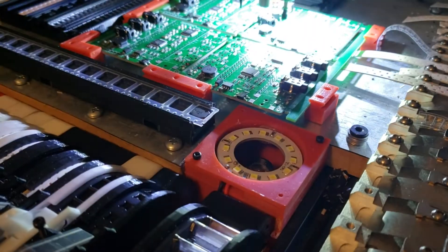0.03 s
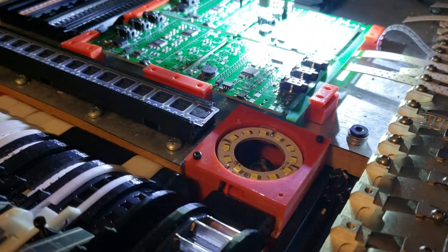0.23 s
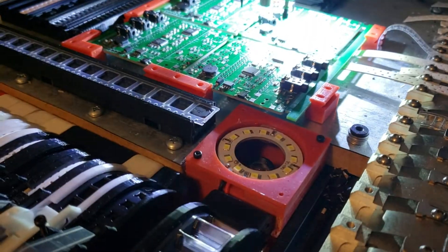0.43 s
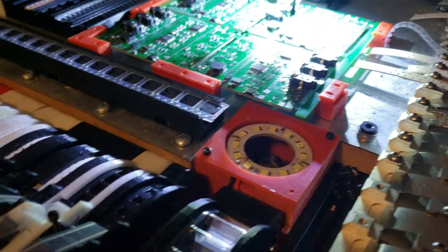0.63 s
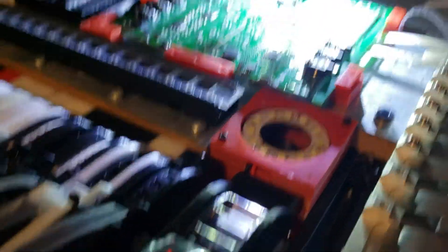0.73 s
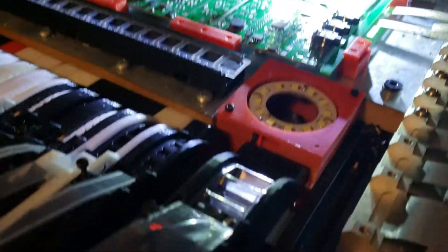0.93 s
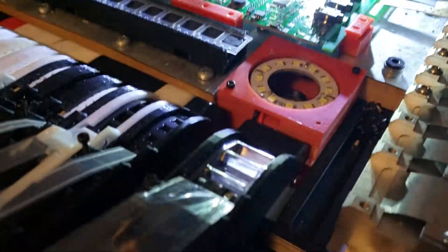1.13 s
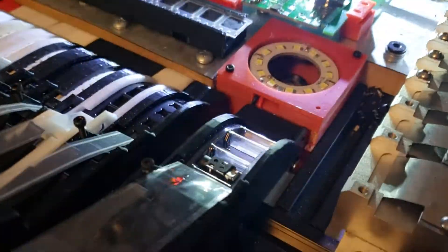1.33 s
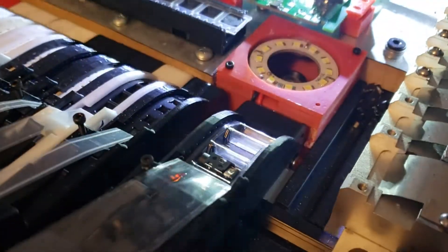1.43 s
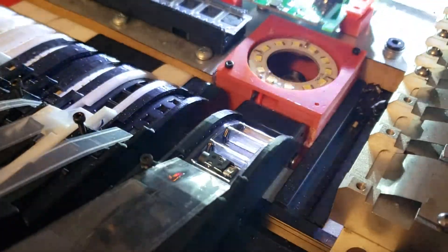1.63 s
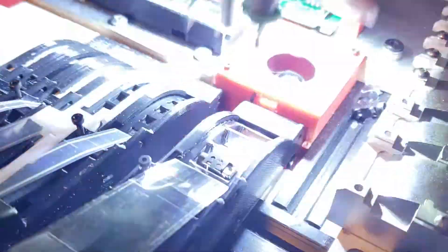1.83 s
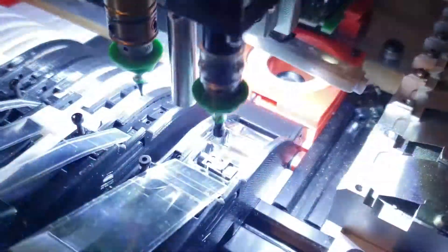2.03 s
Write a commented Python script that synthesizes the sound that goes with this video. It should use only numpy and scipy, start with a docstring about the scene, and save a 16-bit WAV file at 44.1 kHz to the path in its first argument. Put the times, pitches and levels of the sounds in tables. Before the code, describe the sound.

Close and slightly left, the tape feeder of a component placing machine buzzes twice with a high, ratcheting gear whine and a few clicks. Then the head's motor briefly speeds up and brakes, with a low rumble in a quiet workshop.

```python
"""Pick-and-place machine, close up

A stereo pair close in, the machine to its left. The tape feeder's small gear train whirrs twice at an
uneven speed, teeth whining and rattling, swelling once a turn, while the tape mechanism snaps a few
times. As the second run ends, the head's stepper motor ramps up, cruises and brakes. Behind it all
lie workshop air, a low hum and a rumble."""
import sys
import numpy as np
from scipy import signal
from scipy.fft import rfft, irfft, next_fast_len
from scipy.io import wavfile
from scipy.ndimage import uniform_filter1d, map_coordinates

SR = 44100
rng = np.random.default_rng(int(sys.argv[2]) if len(sys.argv) > 2 else 0)


def int16_out(signal):
    """Quantize to a 16-bit WAV file."""
    q = np.round(np.clip(np.atleast_2d(signal).T, -1, 1) * 32767)
    wavfile.write(sys.argv[1], SR, q.astype(np.int16))


N = 92610
T = np.arange(N) / SR

# gear speed, one list for each run (time [s], speed [turns/s])
GEAR_SPEED = [
    [(.172, 44), (.23, 56.3), (.295, 48.43), (.345, 63.19), (.41, 69.5), (.52, 65.5), (.59, 51.04)],
    [(.651, 44.1), (.75, 65.64), (.815, 45.71), (.88, 72.5), (.975, 83.26), (1.03, 76.71), (1.12, 70.9),
     (1.21, 71.28), (1.285, 50.19), (1.34, 78.4), (1.39, 78.4), (1.425, 68.95), (1.46, 53.59),
     (1.505, 43.5), (1.55, 53.85), (1.585, 57.23), (1.625, 67.51), (1.67, 48.35), (1.74, 34.6),
     (1.79, 51.57)],
]
# runs of the gears (start [s], stop [s], flutter of the tooth phase [rad], grinding [dB])
GEAR_RUNS = [(.173, .576, .85, -9), (.651, 1.801, .45, -12)]
# overall loudness of the gears (time [s], level [dB])
GEAR_LEVEL = [(.18, -36), (.245, -32), (.28, -36), (.345, -29), (.56, -28), (.66, -36), (.75, -32),
              (.92, -33), (1.05, -28), (1.075, -33.5), (1.16, -29.5), (1.25, -31.5), (1.42, -30.5),
              (1.64, -32), (1.73, -36.5), (1.8, -33)]
# whine ahead of the body's colour (time [s], tooth rate [dB], its double [dB], its triple [dB])
WHINE_LEVELS = [(.185, -7, -4.5, -9), (.205, 4, -29, -7), (.29, -14.5, -14, -5.5), (.325, -7, -4, -18),
                (.345, -1.5, -13, -33), (.52, -3.5, -15, -13), (.7, -16.5, -19.5, -5.5),
                (.84, -2.5, 0, -12), (.865, -3.5, -11, -12), (1.18, -2.5, -7.5, -22),
                (1.285, -7.5, -6, -14), (1.35, -1, -17, -14), (1.45, -4, 0, -9.5), (1.56, -9.5, -14, -13.5),
                (1.64, -1.5, -2, -3), (1.79, -41, 0, -3)]
# swell of the tooth load once a turn (time [s], depth [dB])
LOAD_SWELL = [(.4, 4), (1.25, 2.5), (1.5, 5.5), (1.78, 8)]
# colour of the feeder's body and of the teeth's bright rattle (frequency [Hz], level [dB])
BODY_COLOUR = [(150, -40), (330, -27), (600, -34), (1800, -13.5), (2400, -1.5), (2950, 1.5), (5200, 1.5),
               (7200, 3.5), (8200, -4.5), (10000, 3)]
TREBLE_COLOUR = [(7000, -51), (9600, -9.5), (12000, 1), (12800, 8.5), (14000, -1.5), (15600, 5.5)]
# resonances of the feeder (frequency [Hz])
RINGS_HZ = [3046, 3354, 3696, 5694, 6430, 12500]
# snaps of the tape mechanism (time [s], crack [dB], noise burst [dB], crack's 60 dB decay [s])
SNAPS = [(.531, -18, -32, .013), (.709, -48, -38, .02), (1.0114, -17, -31, .006), (1.187, -42, -35, .015)]
# colour of a snap's crack and of its longer noise burst (frequency [Hz], level [dB])
CRACK_COLOUR = [(900, -10), (1800, -4.5), (2900, 10.5), (6400, 6.5), (10000, -2.5)]
BURST_COLOUR = [(90, -30), (230, -13), (420, -20), (850, -8.5), (3000, -7.5)]
# travel of the head (starts [s], at speed [s], brakes [s], stops [s])
HEAD_MOVE = (1.605, 1.782, 1.862, 2.041)
# tones of the stepper (multiple of the step rate, level [dB])
STEPPER_TONES = [(.125, 3), (.5, -4), (1, -.5), (2, -16)]
# colour of the machine's frame and of the carriage on its rail (frequency [Hz], level [dB])
FRAME_COLOUR = [(130, -52), (277, 4.5), (550, -28.5), (1060, 6.5), (1400, 1), (2200, 6.5), (4300, 17),
                (7000, -10)]
RAIL_COLOUR = [(200, -10), (276, 2), (400, -9), (700, -16), (1030, -9), (2500, -20.5), (4000, -18.5),
               (9000, -32.5)]
# colour of the workshop air and of the rumble (frequency [Hz], level [dB])
AIR_COLOUR = [(120, -3), (600, -23), (2500, -18), (6000, -25), (9000, -38)]
RUMBLE_COLOUR = [(25, -39), (52, 12), (90, 6), (600, -85)]
# loudness of the rumble (time [s], level [dB])
RUMBLE_LEVEL = [(.16, -63), (.22, -82), (1.58, -80), (1.65, -72), (2.09, -55.5)]
# balance between the microphones (frequency [Hz], left minus right [dB])
MIC_BALANCE = [(60, 0.5), (270, 5), (2000, 3), (4000, 10.5), (9500, 2.5), (14000, 15)]
# likeness of noise at the two microphones (frequency [Hz], correlation)
MIC_CORRELATION = [(60, 0.92), (1500, 0.056)]

TEETH, LOBES, HEAVY_TURN = 48, 5, .3  # the load peaks at this fraction of a turn
ATTACK_S, RELEASE_S = 0.0088, .011
LOBE_DB, TOOTH_DB, SCATTER_DB = 2, 1, -0.5  # ripples of the tooth load
SLOP_RAD, BLUR_RAD, GRIND_HZ = .4, .15, 450  # random unevenness of the meshing teeth
BODY_DB, THRUM_DB, PATCHY_DB = -6, -42, 5
WHINE_HIGHPASS_HZ, RING_WIDTH_HZ, RING_DB = 2340, 65, 0.5
SNAP_HOLD_S, BURST_T60_S = .0024, .08
STEP_HZ, MOTOR_DB, STUTTER_DB = 2216, -49.5, 3.5
BRAKE_DB, SHUDDER_HZ = 11, 1015.5  # while braking the head shudders near this step rate
RAIL_DB, SETTLE_DB, SETTLE_S = -48, -11, 0.039  # the carriage shakes about as it stops
AIR_DB, HUM_HZ, HUM_DB = -65.5, 123.5, -68
ROOM_T60_S, ROOM_DB = 0.2, -12
MIC_LAG_S, TOP_HZ = 0.00014, 15950


def feeder():
    """The tape feeder, close to the microphones: gears and snaps both ring its resonances."""
    drive = sum(gears(speed, *run) for speed, run in zip(GEAR_SPEED, GEAR_RUNS)) + snaps()
    def rings(hz):
        damping = 1j * hz * RING_WIDTH_HZ
        return sum(damping / (ring_hz ** 2 - hz ** 2 + damping) for ring_hz in RINGS_HZ)
    return filtered(drive, lambda hz: 1 + amp(RING_DB) * rings(hz))


def gears(speed, start, stop, flutter_rad, grind_db):
    """Teeth rattle and whine over a faint thrum; their load swells once a turn, flutters five times."""
    turns = np.cumsum(curves(speed)[0] * (T >= speed[0][0])) / SR
    angle = 2 * np.pi * (turns - HEAVY_TURN)
    gate = np.clip((T - start) / ATTACK_S, 0, 1) * np.exp(-np.maximum(T - stop, 0) / RELEASE_S)
    flutter = np.cos(LOBES * angle + .5 * wobble(40.42))
    load_db = curves(LOAD_SWELL)[0] * np.cos(angle) + LOBE_DB * flutter + SCATTER_DB * wobble(900)
    tooth_phase = TEETH * angle + flutter_rad * flutter + SLOP_RAD * wobble(200)
    force = unit(amp(load_db + TOOTH_DB * np.cos(tooth_phase)))
    rattle = amp(BODY_DB) * unit(force ** 0.41) * noise(BODY_COLOUR) + force * noise(TREBLE_COLOUR)
    whine = tooth_whine(tooth_phase, load_db, grind_db)
    thrum = amp(THRUM_DB) * flutter
    return gate * amp(curves(GEAR_LEVEL)[0]) * (patchy(rattle) + whine + thrum)


def tooth_whine(tooth_phase, load_db, grind_db):
    """Meshing teeth sound three harmonics through the body; the higher ones grind more roughly."""
    mesh = 0
    for k, db in enumerate(curves(WHINE_LEVELS), 1):
        roughness = np.sqrt(k)
        grind = amp(grind_db) * (wobble(GRIND_HZ * roughness) + 1j * wobble(GRIND_HZ * roughness))
        tone = np.exp(1j * k * (tooth_phase + BLUR_RAD * wobble(700)))
        mesh += amp(db) * np.real((1 / roughness + roughness * grind) * tone)
    whine = at_mics(amp(0.73 * load_db) * mesh, BODY_COLOUR)
    return filtered(whine, lambda hz: 1 - 1 / (1 + (hz / WHINE_HIGHPASS_HZ) ** 20))


def patchy(rattle):
    """The rattle's colour shifts at random in patches of time and frequency."""
    spectra = signal.stft(rattle, nperseg=512)[2]
    patches = uniform_filter1d(rng.standard_normal(spectra.shape), size=4, axis=1)
    patches = uniform_filter1d(patches, size=9, axis=2)
    return signal.istft(spectra * amp(PATCHY_DB * unit(patches)), nperseg=512)[1][:, :N]


def snaps():
    """Each snap of the tape mechanism is a brief hard crack with a longer burst of broad noise."""
    out = np.zeros((2, N))
    for start, crack_db, burst_db, t60 in SNAPS:
        age = np.maximum(T - start, 0)
        crack = amp(crack_db - 60 * np.maximum(age - SNAP_HOLD_S, 0) / t60) * noise(CRACK_COLOUR)
        burst = amp(burst_db - 60 * age / BURST_T60_S) * noise(BURST_COLOUR)
        out += np.clip(age / 0.0001, 0, 1) * (crack + burst)
    return out


def head():
    """The stepper's stuttering tones glide through the frame's resonances; the carriage rolls along."""
    brakes, stops = HEAD_MOVE[2:]
    speed = np.interp(T, HEAD_MOVE, [0, 1, 1, 0])
    shudder = (T > brakes) / (1 + ((STEP_HZ * speed - SHUDDER_HZ) / 260) ** 2)
    step_phase = 2 * np.pi * np.cumsum(STEP_HZ * speed) / SR
    tones = sum(amp(db + STUTTER_DB * wobble(110)) * np.sin(k * step_phase + .5 * wobble(200))
                for k, db in STEPPER_TONES)
    fade = np.minimum(10 * speed, 1)
    motor = amp(MOTOR_DB + BRAKE_DB * shudder) * at_mics(fade * tones, FRAME_COLOUR)
    settle = amp(SETTLE_DB) * np.exp(-((T - stops) / SETTLE_S) ** 2)
    return motor + amp(RAIL_DB) * (np.sqrt(speed) + settle) * noise(RAIL_COLOUR)


def room(x):
    """The workshop returns a short diffuse tail to each microphone."""
    t = T[:SR // 2]
    tail = rng.standard_normal((2, len(t))) * amp(-60 * t / ROOM_T60_S)
    return signal.fftconvolve(x, tail / np.linalg.norm(tail[0]), axes=1)[:, :N]


def background():
    """Room tone: workshop air, an electric hum and a low rumble that comes and goes."""
    hum = amp(HUM_DB) * np.sin(2 * np.pi * HUM_HZ * T + .5 * wobble(9.93))
    rumble = amp(curves(RUMBLE_LEVEL)[0]) * noise(RUMBLE_COLOUR)
    air = amp(AIR_DB + 1.35 * wobble(7.7)) * noise(AIR_COLOUR)
    return air + hum + rumble


def at_mics(x, colour):
    """A tone coloured by a body, reaching the left microphone first."""
    lead_s = MIC_LAG_S * np.array([[.5], [-.5]])
    return filtered(x, lambda hz: amp(along(colour, hz)) * np.exp(2j * np.pi * hz * lead_s))


def noise(colour):
    """Coloured noise at both microphones, alike in the bass, with a mid of rms 1."""
    def mid_side(hz):
        spread = np.arccos(np.clip(along(MIC_CORRELATION, hz), -1, 1)) / 2
        return amp(along(colour, hz)) * [np.cos(spread), np.sin(spread)]
    mid, side = filtered(rng.standard_normal((2, N)), mid_side)
    return np.array([mid + side, mid - side]) / mid.std()


def amp(db):
    """Decibels to gain."""
    return 10 ** (np.asarray(db) / 20)


def unit(x):
    """Scale to rms 1."""
    return x / np.sqrt(np.mean(x ** 2) + 1e-20)


def along(points, hz):
    """Interpolate (frequency [Hz], value) points on a log axis."""
    freqs, values = np.transpose(points)
    return np.interp(np.log(hz + 1), np.log(freqs + 1), values)


def curves(rows):
    """One value per sample for each column after the time."""
    times, *columns = np.transpose(rows)
    return [np.interp(T, times, column) for column in columns]


def wobble(rate):
    """A smooth random curve, rate knots a second."""
    return map_coordinates(rng.standard_normal(8192), [T * rate], mode="wrap")


def filtered(x, response):
    """Pass x through a frequency response."""
    size = next_fast_len(N + 8192)
    return irfft(rfft(x, size) * response(np.fft.rfftfreq(size, 1 / SR)), size)[..., :N]


def scene():
    """The machine stands close by, left of the microphones; the whole workshop leans that way."""
    machine = feeder() + head()
    def lean_left(hz):
        gains = amp(along(MIC_BALANCE, hz) * np.array([[.5], [-.5]]))
        return gains / np.sqrt(np.mean(gains ** 2, axis=0))
    return filtered(machine + amp(ROOM_DB) * room(machine) + background(), lean_left)


def record(dry):
    """A steep low-pass takes off the very top of the treble."""
    return filtered(dry, lambda hz: 1 / (1 + (hz / TOP_HZ) ** 200))


dry = scene()
out = record(dry)
int16_out(out)
```